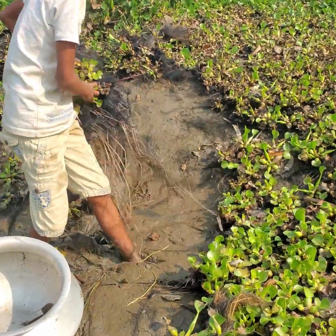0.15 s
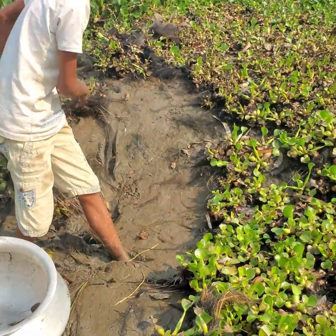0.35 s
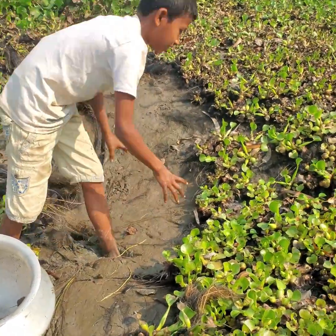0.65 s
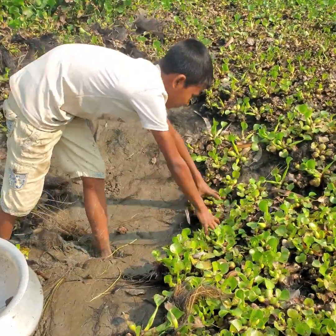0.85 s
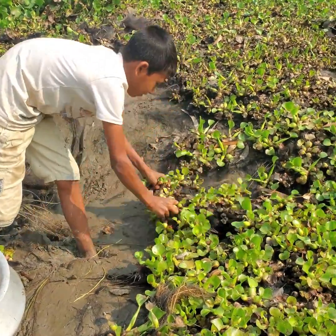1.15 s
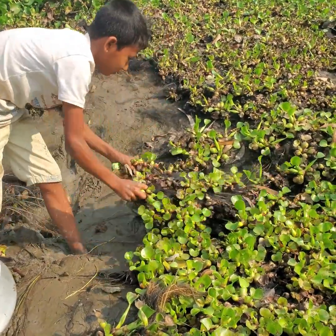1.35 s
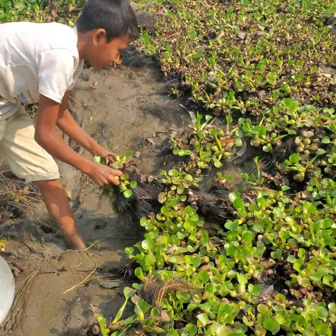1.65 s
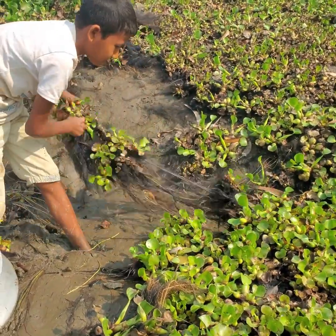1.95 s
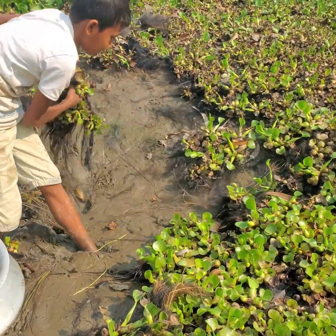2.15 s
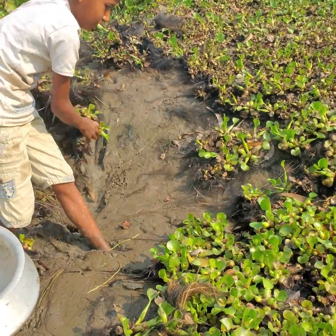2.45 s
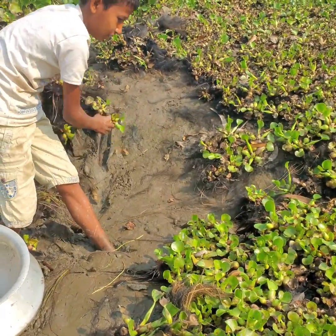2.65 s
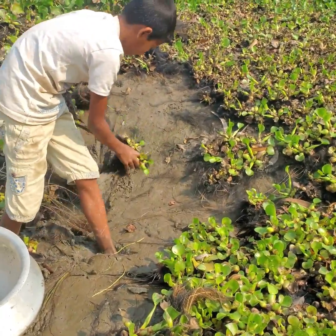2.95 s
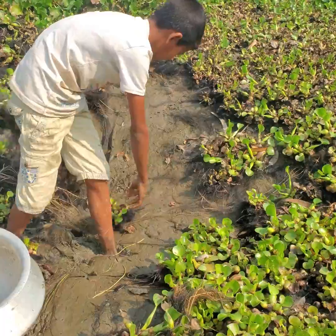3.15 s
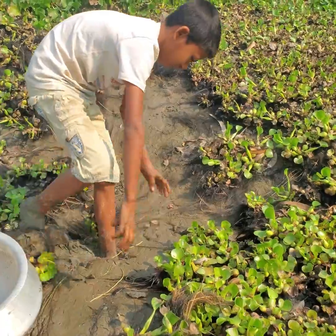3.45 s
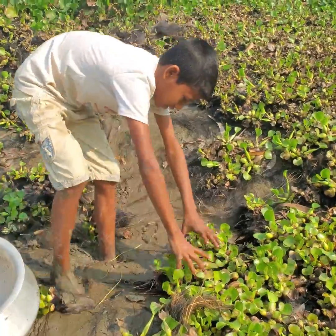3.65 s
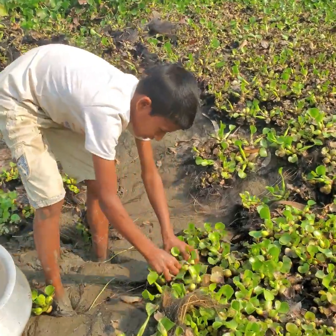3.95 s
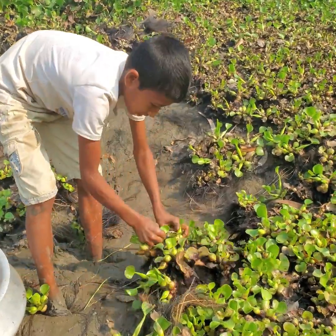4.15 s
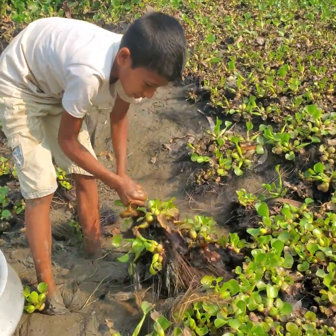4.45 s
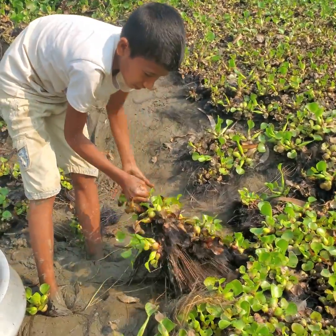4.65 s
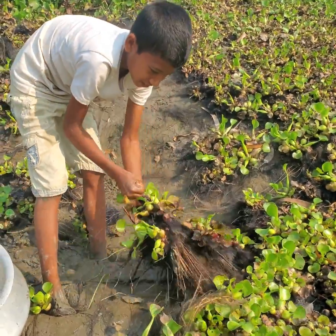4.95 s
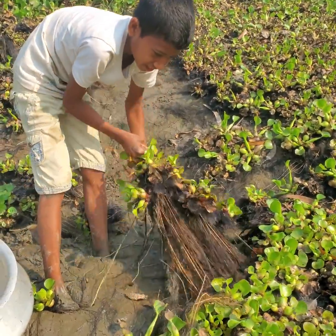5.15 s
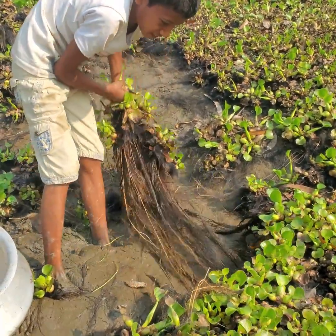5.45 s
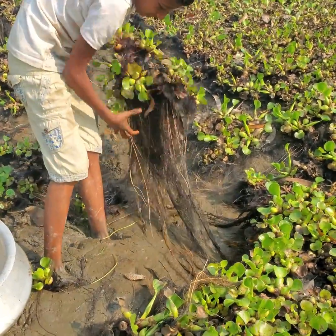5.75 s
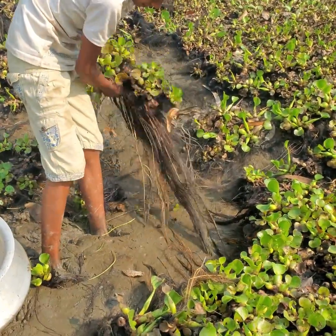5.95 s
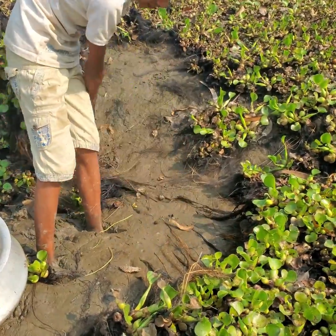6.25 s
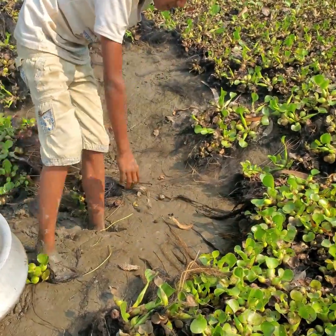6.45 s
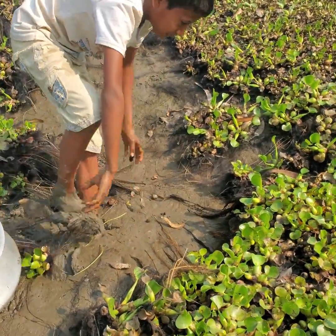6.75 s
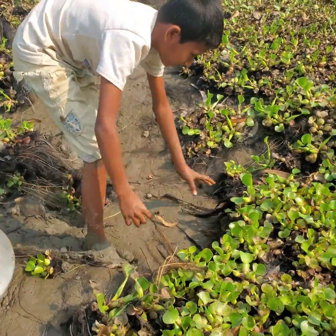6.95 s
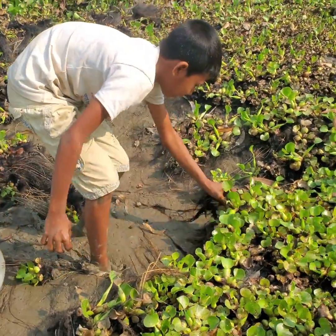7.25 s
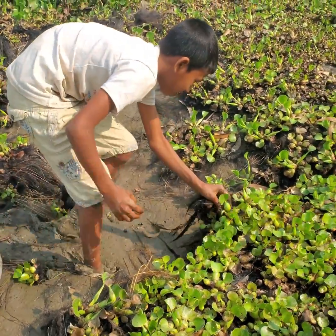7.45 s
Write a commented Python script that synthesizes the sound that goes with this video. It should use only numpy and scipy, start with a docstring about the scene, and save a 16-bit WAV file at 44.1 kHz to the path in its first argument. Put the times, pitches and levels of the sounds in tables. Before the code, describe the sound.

Close, crisp ripping of rooty plants out of a muddy bed, with wet plops, birdsong, light wind and a far engine sinking away.

```python
"""Close to two microphone ports, hands work in a muddy pond bed; a far engine drones under a light wind.
The engine's upper growl soon fades; a first clump tears out in dense crackle, and stalks snap as noise with rings.
From 1.8 s a nearby bird sings in gliding tones and harmonic calls; near 3.8 s a second clump is hauled out.
All along rootlets tick, plants rustle and mud plops in rising tones, while the engine sinks in pitch.
Near 6 s come the loudest snap and plops and a dull thud, then a foot squeaks free and the bird whistles again."""
import sys
import numpy as np
from scipy import signal
from scipy.fft import rfft, irfft, next_fast_len
from scipy.io import wavfile
from scipy.ndimage import uniform_filter1d, map_coordinates

SR = 44100
rng = np.random.default_rng(int(sys.argv[2]) if len(sys.argv) > 2 else 0)


def generate_wav(signal):
    """Clip the signal to [-1, 1] and save it as 16-bit WAV at the path in sys.argv[1]."""
    frames = np.transpose(np.atleast_2d(signal))
    scaled = np.clip(frames, -1, 1) * 32767
    pcm = np.round(scaled).astype(np.int16)
    wavfile.write(sys.argv[1], SR, pcm)


N = 335326  # samples, about 7.6 s
TOP_HZ = 16100  # upper band limit of the microphone, and the highest rootlet click

# colour of tearing roots and crushed leaves: (frequency [Hz], relative level [dB])
ROOTS = [(1500, -39.5), (2400, -6.5), (4700, 0.5), (6000, -6.5), (7800, -11), (10000, -7), (16000, -23)]
# colour of wet mud: (frequency [Hz], relative level [dB])
MUD = [(100, -10.5), (300, 3), (2200, 5), (4000, -1), (8000, -76)]


def amp(db):
    """Decibels to gain."""
    return 10 ** (np.asarray(db) / 20)


def unit(x):
    """Scaled to rms 1."""
    return x / np.sqrt(np.mean(x ** 2) + 1e-20)


def along(points, hz):
    """(Hz, value) points read on a log frequency axis."""
    f, v = np.transpose(points)
    return np.interp(np.log(hz + 1), np.log(f + 1), v)


def curves(rows):
    """One value per sample for each column after the time."""
    s, *cols = np.transpose(rows)
    return [np.interp(np.arange(N) / SR, s, c) for c in cols]


def wobble(rate, size=N):
    """A smooth random curve, rate knots a second."""
    knots = rng.standard_normal(int(size * rate / SR) + 4)
    return map_coordinates(knots, [np.arange(size) * rate / SR])


def fade(t, t60):
    """A decay of 60 dB in t60 seconds."""
    return np.exp(-np.log(1000) * t / t60)


def add(track, s, sound):
    """Mix a sound into the stereo track at time s."""
    start = max(round(s * SR), 0)
    part = track[:, start:start + sound.shape[-1]]
    part += sound[..., :part.shape[-1]]


def coloured(x, points, size=4096):
    """x through a causal minimum-phase filter with the (Hz, dB) shape."""
    cepstrum = irfft(np.log(amp(along(points, np.fft.rfftfreq(size, 1 / SR)))))
    # fold the cepstrum forward in time, so the filter never rings ahead
    cepstrum[1:size // 2] *= 2
    cepstrum[size // 2 + 1:] = 0
    response = irfft(np.exp(rfft(cepstrum)))
    return signal.fftconvolve(np.atleast_2d(x), response[None], axes=1)[:, :x.shape[-1]]


def paired(x):
    """Two unrelated channels become alike in the bass, as at two close microphone ports."""
    # likeness of the left and right ports: (frequency [Hz], correlation [0 to 1])
    alike = [(100, 0.95), (300, 0.74), (700, 0.67), (1500, 0.00096), (3000, 0.11)]
    size = next_fast_len(x.shape[-1])
    likeness = np.clip(along(alike, np.fft.rfftfreq(size, 1 / SR)), -1, 1)
    turn = np.arccos(likeness) / 2
    mid, side = irfft(rfft(x, size) * [np.cos(turn), np.sin(turn)], size)[:, :x.shape[-1]]
    return np.array([mid + side, mid - side])


def rush(spectrum, patchy_db):
    """Stereo noise of rms 1, patchy in time and frequency."""
    z = signal.stft(rng.standard_normal((2, N)), nperseg=1024)[2]
    field = uniform_filter1d(rng.standard_normal(z.shape[1:]), size=4, axis=0)
    field = uniform_filter1d(field, size=8, axis=1)
    noise = signal.istft(z * amp(patchy_db * unit(field)), nperseg=1024)[1][:, :N]
    return unit(coloured(paired(noise), spectrum))


def crackle(rate, spread_db, t60, count=8):
    """Random tiny breaks of uneven size, rate a second; each group of fibres rings in its own way."""
    t = np.arange(SR // 50) / SR
    out = np.zeros((2, N))
    for _ in range(count):
        breaks = int(rate * N / SR / count)
        sizes = amp(spread_db * np.minimum(rng.exponential(size=breaks), 4))
        sizes = sizes * rng.choice([-1, 1], breaks)
        train = np.bincount(rng.integers(N, size=breaks), sizes, N)
        ring = unit(paired(rng.standard_normal((2, len(t)))) * fade(t, t60))
        out += signal.oaconvolve(train[None], ring, axes=1)[:, :N]
    return out


def effort():
    """Tearing level in dB: each haul strains, tears and drags its roots; rustles come and go between."""
    # clumps torn out of the bed: (time the roots start to part [s], length [s], level [dB])
    hauls = [(0.904, 0.35, -47), (3.831, 0.35, -43.5)]
    # plants gripped, shaken or brushed: (time [s], length [s], level [dB])
    rustles = [(0.536, 0.12, -53.5), (1.82, 0.68, -57.5), (2.113, 0.12, -52.5), (3.205, 0.2, -52.5),
               (4.424, 0.094, -51.5), (4.876, 0.28, -51), (5.26, 0.29, -59), (5.725, 0.071, -52),
               (5.945, 0.46, -56.5), (6.498, 0.084, -49), (7.314, 0.25, -57.5)]
    attack_db_per_s, release_db_per_s = 249, 182  # how fast any rustle sets in and dies
    grip_db, grip_db_per_s = -7, 19  # strain just before the roots part, and how fast it builds
    drag_db, drag_db_per_s, drag_s = -6, 15, 0.65  # loose roots then trail over the mud
    settle_db = -66  # the disturbed plants never lie quite still
    t = np.arange(N) / SR

    def held(s, length):
        """Full level from s for length seconds, with steep slopes in dB to either side."""
        attack = attack_db_per_s * np.maximum(s - t, 0)
        release = release_db_per_s * np.maximum(t - s - length, 0)
        return -attack - release

    parts = [db + held(s, length) for s, length, db in rustles + hauls]
    for s, length, db in hauls:
        free = s + length
        strain = grip_db - grip_db_per_s * np.maximum(s - t, 0)
        drag = drag_db - drag_db_per_s * np.maximum(t - free, 0)
        parts.append(db + strain + held(0, s))
        parts.append(db + drag + held(free, drag_s))
    power = amp(settle_db) ** 2 + np.sum(amp(parts) ** 2, axis=0)
    return 10 * np.log10(power)


def tearing(pull_db, roots_db=3, mud_db=-6, flutter_db=2.37, brighten=0.033):
    """Fine roots part in dense crackle while the wet mud around them squelches."""
    unevenness = wobble(35) + wobble(11)
    effort_db = pull_db - pull_db.max() + flutter_db * unevenness
    fibres = unit(coloured(crackle(rate=1700, spread_db=4.4, t60=0.007), ROOTS))
    # a harder pull breaks the fibres more sharply: brighten is treble dB per dB of effort
    sharp = coloured(fibres, [(4500, -42.0), (9000, -1.0)])
    dull = coloured(fibres, [(5000, 0.0), (9000, -8.0)])
    fibres = dull + sharp * amp(brighten * effort_db)
    squelch = unit(coloured(crackle(rate=600, spread_db=-1.5, t60=0.024), MUD))
    torn = fibres * amp(effort_db + roots_db) + squelch * amp(effort_db + mud_db)
    return amp(pull_db.max()) * torn


def ticks(pull_db, hz=7200, scatter=0.43, follow=0.63):
    """Single rootlets give way with sharp little clicks, harder as the pull grows."""
    count, cycles, spread_db = 620, 0.9, 5.5  # clicks in all, cycles per e-fold of decay, size spread
    start = rng.integers(N, size=count)
    pitch = np.minimum(hz * np.exp(scatter * rng.standard_normal((count, 1))), TOP_HZ)
    force_db = pull_db.max() + follow * (pull_db[start] - pull_db.max())
    size = amp(force_db + spread_db * np.minimum(rng.exponential(size=count), 3))
    turns = pitch * np.arange(SR // 100) / SR
    rings = size[:, None] * np.exp(-turns / cycles) * np.cos(2 * np.pi * turns)
    at = start[:, None] + np.arange(turns.shape[1])
    out = []
    for _ in range(2):
        # each click reaches the two ports at slightly different moments
        arrival = at + rng.integers(12, size=(count, 1))
        out.append(np.bincount(arrival.ravel(), rings.ravel(), N)[:N])
    return np.array(out)


def crunches():
    """A handful gives way all at once: a quick burst of crackle that dies away."""
    # leaves and wet roots crushed in a hand or underfoot, each peaking a quarter of its length in:
    # (time [s], length [s], leaves [dB], mud [dB])
    handfuls = [(0.534, 0.029, -59, -44.5), (2.103, 0.015, -32.5, -67), (3.195, 0.044, -46.5, -54),
                (3.279, 0.023, -37.5, -48), (3.318, 0.012, -42, -44), (3.836, 0.013, -30, -44),
                (4.43, 0.021, -31.5, -42.5), (4.487, 0.015, -32, -37.5), (4.862, 0.048, -46, -50.5),
                (6.646, 0.04, -40, -45), (6.958, 0.074, -44.5, -48.5)]
    leaves = unit(coloured(crackle(rate=830, spread_db=5.5, t60=0.031), ROOTS))
    mud = unit(coloured(crackle(rate=1300, spread_db=-4.5, t60=0.014), MUD))
    out, t = np.zeros((2, N)), np.arange(SR // 4) / SR
    for s, length, crisp_db, wet_db in handfuls:
        u = 4 * t / length
        at = round(s * SR) + np.arange(len(t))
        crushed = amp(crisp_db) * leaves[:, at] + amp(wet_db) * mud[:, at]
        add(out, s, u * np.exp(1 - u) * crushed)
    return out


def snaps(level_db=1, ring_scatter=0.13, ring_t60=0.028, ring_db=0, leaves_db=-20, leaves_t60=0.11,
          strain_db=-15, lag=0.00013, count=4):
    """A stalk strains and cracks, its air cells ring round one pitch and the leaves shiver; wet ones are duller."""
    # stalks and roots that snap: (time [s], level before level_db [dB], centre of the ring [Hz])
    stalks = [(0.294, -40, 5200), (0.5385, -35, 1920), (1.0733, -39.5, 4150), (1.091, -38, 4670),
              (1.207, -28.5, 5260), (1.391, -36.5, 4870), (1.4534, -24, 4320), (1.504, -39, 4500),
              (2.167, -35, 2100), (2.1945, -30, 2230), (2.4413, -40.5, 4960), (2.9548, -37, 3940),
              (3.2273, -32.5, 2640), (3.5888, -40, 4670), (3.6611, -38.5, 3970), (3.8338, -30.5, 5360),
              (3.9999, -35, 4530), (4.013, -38, 5000), (4.07, -32.5, 4570), (4.1259, -30.5, 4500),
              (4.402, -33.5, 3970), (4.455, -31.5, 4350), (4.517, -27, 4570), (4.888, -29.5, 3650),
              (5.089, -32.5, 3800), (5.206, -21.5, 4330), (5.3134, -40, 4460), (5.3694, -39.5, 4970),
              (6.0559, -20, 3700), (6.119, -33.5, 3100), (6.2973, -41, 4700), (7.3125, -35.5, 4200),
              (7.421, -31.5, 2120)]
    # colour of the crack: (frequency [Hz], relative level [dB])
    stalk_colour = [(200, -31), (900, -4.5), (4300, 5.5), (6000, -2.5), (8000, -10), (10500, -1.5),
                    (16000, -9.5)]
    lead, crack_t60 = 0.002, 0.011  # seconds of strain ahead of the crack, and its decay
    out, t = np.zeros((2, N)), np.arange(SR // 10) / SR - lead
    t = t - np.array([[0], [lag]])  # the right port hears it later, by lag seconds
    after = np.maximum(t, 0)
    broken = fade(after, crack_t60) + amp(leaves_db) * fade(after, leaves_t60)
    shape = np.where(t > 0, broken, amp(strain_db))
    for s, db, hz in stalks:
        crack = coloured(paired(rng.standard_normal(t.shape)) * shape, stalk_colour)
        # a low ring goes with a dull crack
        crack = coloured(crack, [(5000, 0), (11000, 15 * np.log2(hz / 4600))])
        spread = np.linspace(-1, 1, count) + rng.uniform(-0.42, 0.51, count)
        cells = hz * np.exp(ring_scatter * spread)
        tones = sum(np.sin(2 * np.pi * cell * after + rng.uniform(0, 2 * np.pi)) for cell in cells)
        ring = tones * fade(after, ring_t60) * (t > 0)
        snap = unit(unit(crack) + amp(ring_db) * unit(ring))
        add(out, s - lead, amp(db + level_db) * snap / np.sqrt(30))
    return out


def plops(cycles=26, rise=4, splat_t60=0.054, attack=0.00036):
    """A pocket of air opens in the mud: a short rising tone in a wet splat."""
    # mud pockets that burst: (time [s], level [dB], opening pitch [Hz], splat against tone [dB])
    pockets = [(0.299, -29.5, 1003, -10), (2.211, -34.5, 1260, -4), (3.335, -34.5, 614, 1.5),
               (6.044, -18.5, 4200, -23), (6.0516, -18.5, 2250, -12.5), (6.107, -25, 984, -14.5),
               (6.985, -29, 1850, -10.5), (7.352, -33.5, 1630, -11), (7.42, -30.5, 628, -10),
               (7.486, -36.5, 627, -4.5)]
    out, t = np.zeros((2, N)), np.arange(SR // 10) / SR
    for s, db, hz, splat_db in pockets:
        # small, high pockets die soonest
        tone = np.sin(2 * np.pi * hz * (t + rise * t ** 2)) * fade(t, cycles / hz)
        splat = unit(coloured(paired(rng.standard_normal((2, len(t)))), MUD)) * fade(t, splat_t60)
        onset = 1 - np.exp(-t / attack)
        add(out, s, amp(db) * (tone + amp(splat_db) * splat) * onset)
    return out


def gurgles(length=0.06, gap=0.013, scatter=0.14, cycles=24):
    """Water runs into a hollow in the mud as a quick string of soft, low bubbles."""
    # gurgling hollows: (time [s], middle pitch of the bubbles [Hz], level [dB])
    hollows = [(0.89, 532, -40), (1.96, 490, -49), (3.395, 667, -41), (3.69, 670, -40.5)]
    out, t = np.zeros((2, N)), np.arange(SR // 10) / SR
    for s, pitch, db in hollows:
        for start in np.arange(s, s + length, gap):
            hz = pitch * np.exp(scatter * rng.standard_normal())
            rising = np.sin(2 * np.pi * hz * (t + 2 * t ** 2))
            bubble = rising * fade(t, cycles / hz) * (1 - np.exp(-t * hz))
            add(out, start + gap * rng.random(), amp(db) * bubble)
    return out


def thuds(hz=250, t60=0.02, smear=0.53):
    """Soft mud takes a weight with one low, quickly damped push."""
    # dull thuds of the clump and of feet in the mud: (time [s], level [dB])
    weights = [(4.49, -24), (6.054, -20)]
    out, t = np.zeros((2, N)), np.arange(SR // 8) / SR
    for s, db in weights:
        push = np.sin(2 * np.pi * hz * t + smear * wobble(260, len(t))) * (1 - np.exp(-t * hz * 2))
        add(out, s, amp(db) * push * fade(t, t60))
    return out


def suction(level_db=-47):
    """A foot lifts out of the mud and the closing hollow squeaks upward."""
    out = np.zeros((2, N))
    add(out, 6.5, amp(level_db) * glide(0.068, [520, 930, 1850], waver=0.07))
    return out


def glide(length, pitches, waver, flutter_db=2):
    """A swelling tone whose pitch bends through three points."""
    u = np.linspace(0, 1, int(length * SR))
    bend = np.polyval(np.polyfit([0, 0.5, 1], pitches, 2), u)
    hz = bend * (1 + waver * wobble(337, len(u)))
    swell = np.sin(np.pi * u) * amp(flutter_db * wobble(99.0, len(u)))
    return swell * np.sin(2 * np.pi * np.cumsum(hz) / SR)


def bird(echo_db=-11, echo_t60=0.29, near_db=-10, near_t60=0.038, left_db=0.7):
    """Reedy slurs, pure whistles and rough chips, scattered by the near plants and the far bank."""
    # reedy calls that hold a pitch, then bend to another: (time [s], length [s],
    # first fundamental [Hz], last fundamental [Hz], middle of the bend after the start [s], level [dB])
    slurs = [(2.146, 0.18, 1302, 622, 0.13, -40.5), (2.471, 0.13, 1320, 785, 0.065, -38.5),
             (2.714, 0.099, 1174, 1332, 0.025, -41.5), (3.031, 0.096, 1154, 1445, 0.026, -46),
             (3.321, 0.082, 1218, 1430, 0.017, -37.5), (4.732, 0.17, 1213, 670, 0.12, -36.5),
             (5.083, 0.104, 1230, 740, 0.049, -35.5)]
    # pure whistles: (time [s], length [s], first, middle and last pitch [Hz], level [dB])
    whistles = [(1.828, 0.085, 3400, 3630, 3360, -38.5), (2.037, 0.062, 3140, 3290, 3570, -31.5),
                (3.614, 0.1, 3890, 3990, 3970, -35.5), (3.67, 0.088, 4150, 3500, 3860, -34.5),
                (3.733, 0.19, 3720, 4140, 4150, -39), (3.9, 0.15, 3750, 3940, 4050, -43.5),
                (4.395, 0.08, 3330, 3600, 3500, -32.5), (4.559, 0.13, 3180, 3210, 3424, -34),
                (7.239, 0.1, 3520, 3630, 3400, -42.5), (7.4, 0.1, 3275, 3130, 3305, -26.5),
                (7.577, 0.057, 3890, 3670, 3530, -36.5)]
    # the rough low chip that ends each rising call: (time [s], middle pitch [Hz])
    chips = [(2.79, 2980), (3.1, 3210), (3.385, 3110)]
    chip_s, chip_db, chip_fall_hz = 0.0346, -35, 130  # length, level, fall to either side of the pitch
    lag = 20  # samples by which the bird reaches the left port first
    song, t = np.zeros((2, N)), np.arange(SR // 2) / SR
    notes = []
    for s, length, first_hz, last_hz, bend_s, db in slurs:
        notes.append((s, amp(db) * slur(length, first_hz, last_hz, bend_s)))
    for s, length, *pitches, db in whistles:
        notes.append((s, amp(db) * glide(length, pitches, waver=0.0074)))
    for s, hz in chips:
        pitches = [hz + chip_fall_hz, hz, hz - chip_fall_hz]
        notes.append((s, amp(chip_db) * glide(chip_s, pitches, waver=0.042)))

    def scatter(t60):
        """Decaying noise of unit energy as a cloud of reflections."""
        return unit(rng.standard_normal((2, len(t))) * fade(t, t60)) / np.sqrt(len(t))

    for s, note in notes:
        paths = amp(near_db) * scatter(near_t60) + amp(echo_db) * scatter(echo_t60)
        paths[[0, 1], [0, lag]] += 1  # the direct sound
        add(song, s, signal.fftconvolve(note[None], paths, axes=1))
    return song * amp([[left_db], [-left_db]])


def slur(length, first_hz, last_hz, bend_s, steepness=3.3, waver=0.0164, flutter_db=2.5,
         below_db=-14, above_db=-13, reedy_db=19, reedy_s=0.031):
    """A call holds its pitch, then bends; a rising one starts reedy and clears to its third harmonic."""
    # resonance of the bird's throat: (frequency [Hz], gain [dB])
    throat = [(2000, -13), (2600, -8.5), (3650, 3.5), (4200, -3), (4600, -6)]
    t = np.arange(int(length * SR)) / SR
    bend = last_hz + (first_hz - last_hz) / (1 + (t / bend_s) ** steepness)
    hz = bend * (1 + waver * wobble(355, len(t)))
    phase = 2 * np.pi * np.cumsum(hz) / SR
    swell = np.sqrt(np.sin(np.pi * t / length)) * amp(flutter_db * wobble(101, len(t)))
    onset_db = reedy_db * np.exp(-(t / reedy_s) ** 2) * (last_hz > first_hz)
    # harmonics 2, 3 and 4
    harmonics = enumerate([below_db + onset_db, 0, above_db + onset_db], 2)
    return swell * sum(amp(gain_db + along(throat, k * hz)) * np.sin(k * phase) for k, gain_db in harmonics)


def engine(unsteady=0.0049, drift_db=1.5):
    """Low firing orders carry far and shift as the engine moves; its upper growl soon fades."""
    # the far engine: (time [s], firing rate [Hz], drone level [dB])
    course = [(0, 28.9, -44.5), (1.2, 28.4, -42.5), (2, 29.1, -42.5), (2.8, 28.6, -45.5), (4, 24.7, -44),
              (4.8, 24.3, -55.5), (7.6, 20.1, -67)]
    # its orders as it moves: (multiple of the firing rate, early [dB], middle [dB], late [dB])
    order_levels = [(2, -5.5, -7, -9), (3, -7, 1.5, 3), (4, -4, -7, -5), (5, -9, -24, -11)]
    rate, db = curves(course)
    phase = 2 * np.pi * np.cumsum(rate * (1 + unsteady * wobble(8))) / SR
    drone = np.zeros(N)
    for order, early, middle, late in order_levels:
        order_db, = curves([(1.5, early), (1.75, middle), (3.9, middle), (5, late)])
        tone = np.sin(round(order) * phase + rng.uniform(0, 2 * np.pi))
        drone += amp(order_db + drift_db * wobble(4.88)) * tone
    return amp(db) * drone + growl(rate, phase)


def growl(rate, phase, waver_db=4, smear=1.17):
    """The engine's upper orders, heard only at first, each swelling and sinking on its own."""
    # colour of the growl: (frequency [Hz], relative level [dB])
    growl_colour = [(300, 0.5), (450, -12), (1400, -11.5), (2200, -23)]
    size = 2 * SR
    orders = np.zeros(size)
    for k in range(6, 72):
        gain = amp(along(growl_colour, k * rate[0]) + waver_db * wobble(9.57, size))
        orders += gain * np.sin(k * phase[:size] + smear * wobble(9.04, size))
    level_db, = curves([(0, -60), (0.3, -52), (0.55, -59.5), (0.8, -70), (2, -68.5)])
    return amp(level_db) * np.pad(unit(orders), (0, N - size))


def wind(rumble_db=-47, air_db=-59, hum_db=-67, gust_db=1.5):
    """Low wind rumble, the hiss of the open field and a wavering far-off hum, all shaped noise."""
    # colour of the low rumble: (frequency [Hz], relative level [dB])
    rumble_colour = [(15, -29), (52, -4), (75, 1), (110, -7), (170, -16.5), (600, -55.5)]
    # colour of the open field's hiss: (frequency [Hz], relative level [dB])
    air_colour = [(100, -10.5), (200, 3.5), (400, -10.5), (1000, -7), (1500, -14.5), (2200, -6.5),
                  (3400, -7), (4600, -9.5), (7800, -20.5), (10000, -18.5), (16000, -32)]
    hum_colour = [(330, -35.5), (480, -10.5), (560, -8.0), (850, -42)]  # (frequency [Hz], level [dB])
    rumble = amp(rumble_db + gust_db * wobble(5.7)) * rush(rumble_colour, patchy_db=0.5)
    air = amp(air_db) * rush(air_colour, patchy_db=5.0)
    hum = amp(hum_db + 1.9 * wobble(4.07)) * rush(hum_colour, patchy_db=5.5)
    return rumble + air + hum


def scene():
    """The work in the mud, in front of the bird, the engine and the wind."""
    pull_db = effort()
    plants = tearing(pull_db) + ticks(pull_db) + crunches() + snaps()
    mud = plops() + gurgles() + thuds() + suction()
    return plants + mud + bird() + engine() + wind()


def record(dry):
    """Each microphone port has its own treble colour, under a steep band limit."""
    # balance of the two ports: (frequency [Hz], left minus right [dB])
    ports = [(1500, 0), (2700, -2), (4000, -4), (5200, -6.5), (7000, 7), (9500, -7.5), (12500, 4),
             (16000, 18.5)]
    size = next_fast_len(N + SR // 4)
    hz = np.fft.rfftfreq(size, 1 / SR)
    colour = amp(along(ports, hz) * np.array([[0.5], [-0.5]]))
    band = 1 + (hz / TOP_HZ) ** 160
    return irfft(rfft(dry, size) * colour / band, size)[:, :N]


dry = scene()
out = record(dry)
generate_wav(out)
```